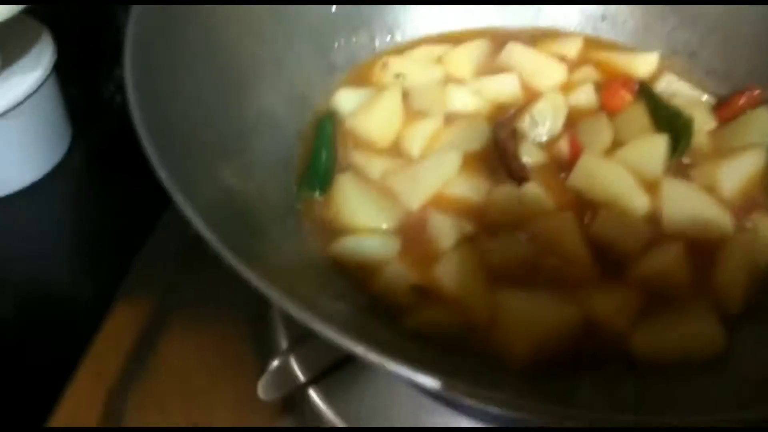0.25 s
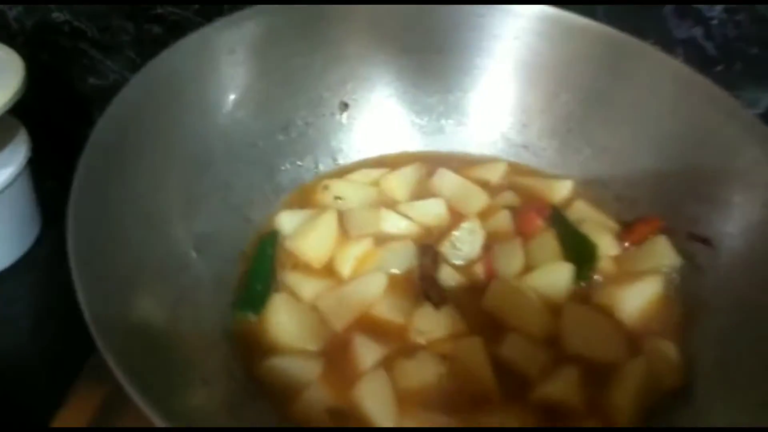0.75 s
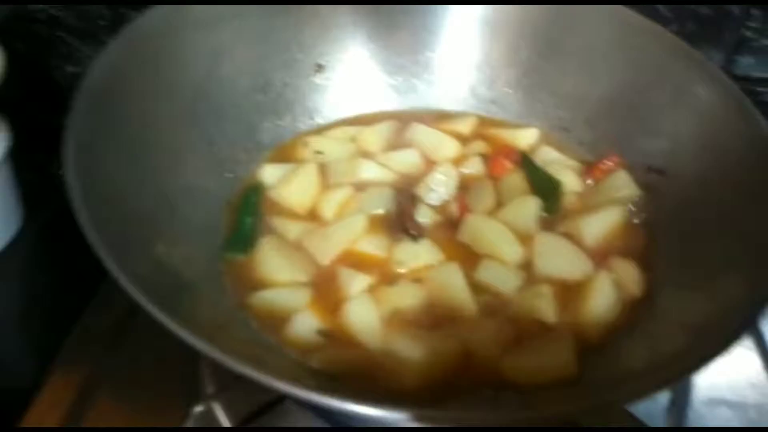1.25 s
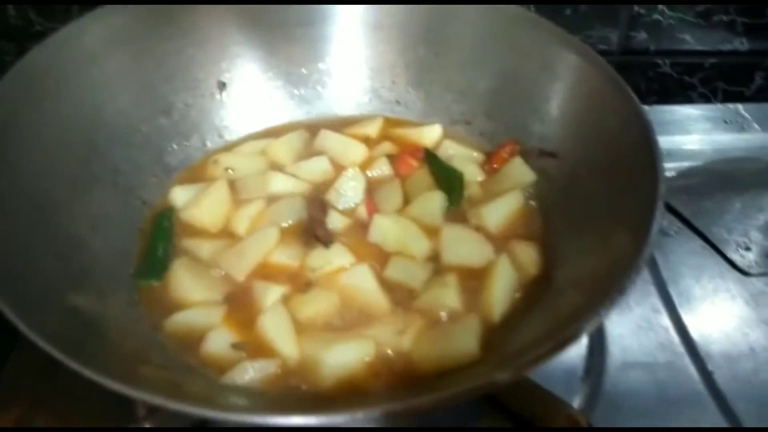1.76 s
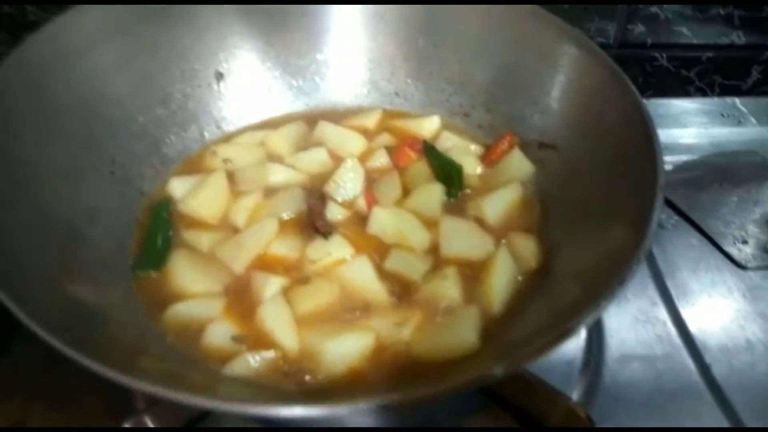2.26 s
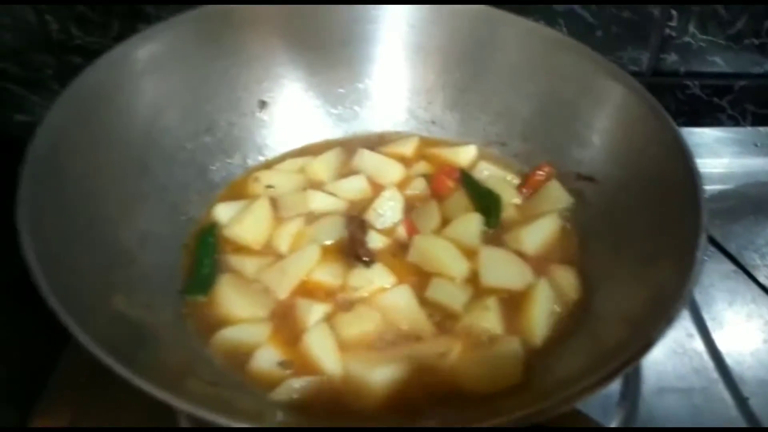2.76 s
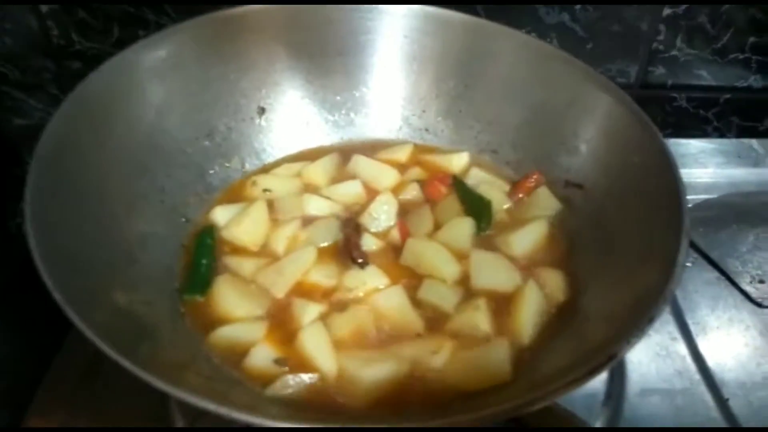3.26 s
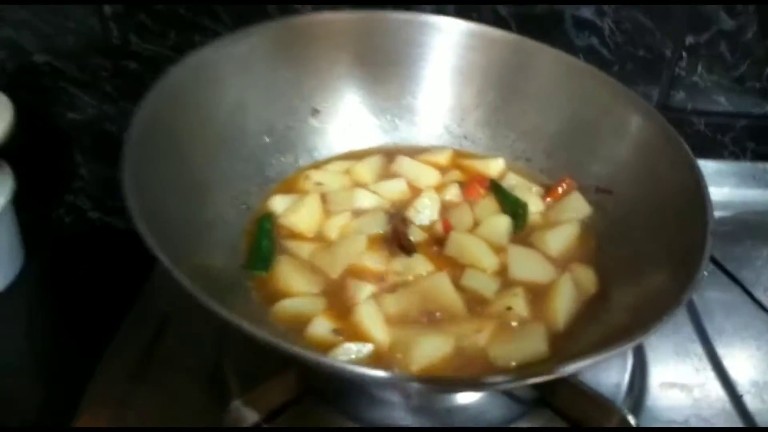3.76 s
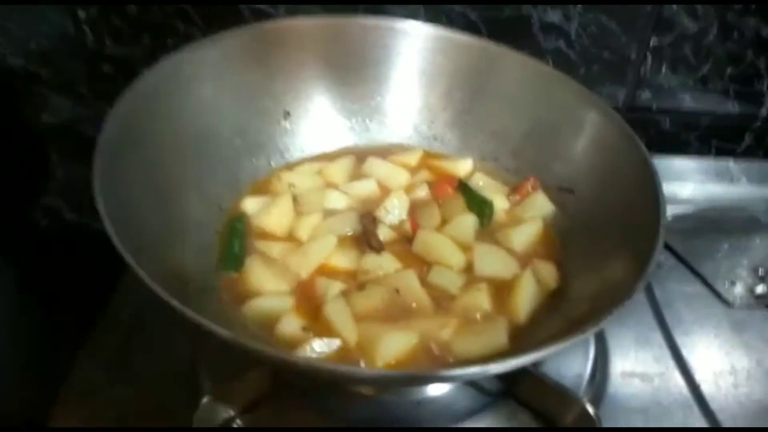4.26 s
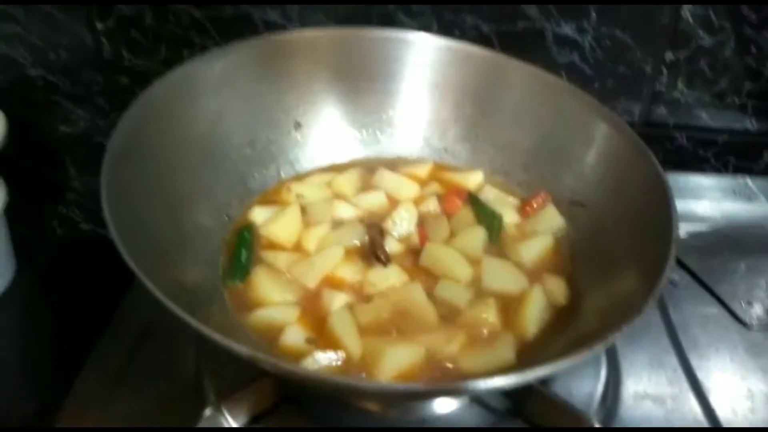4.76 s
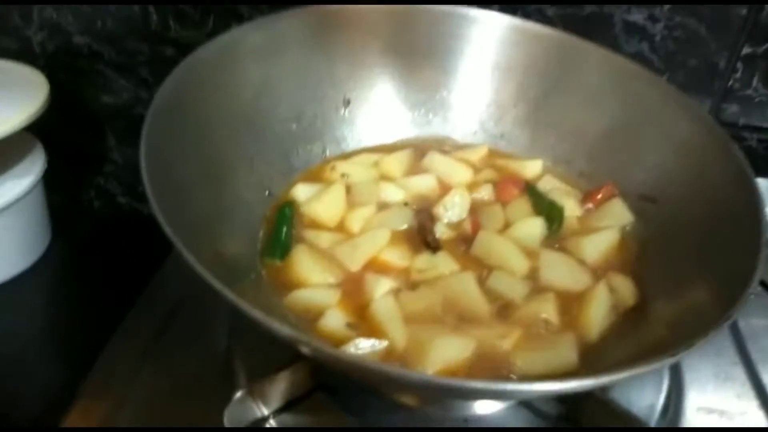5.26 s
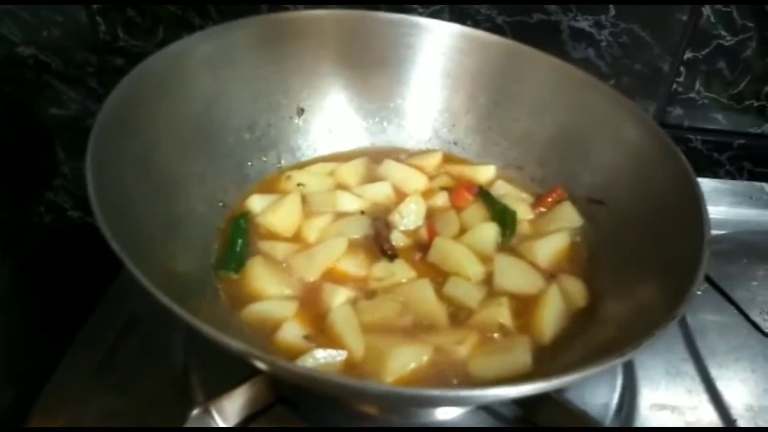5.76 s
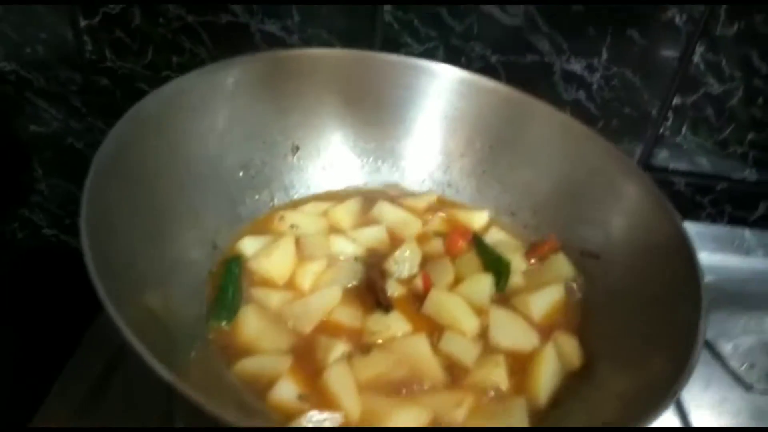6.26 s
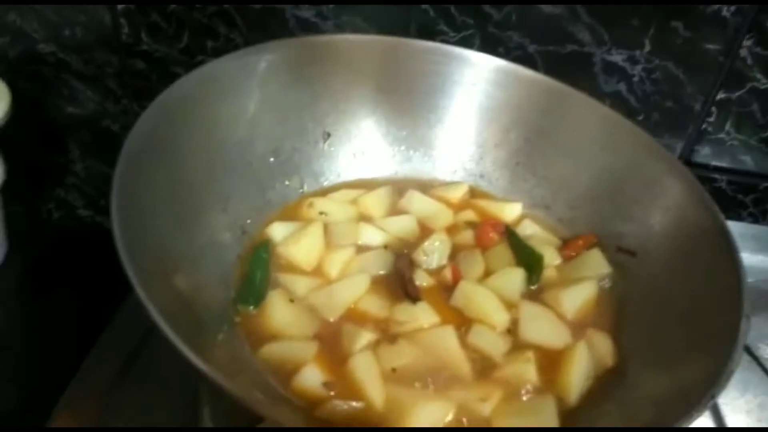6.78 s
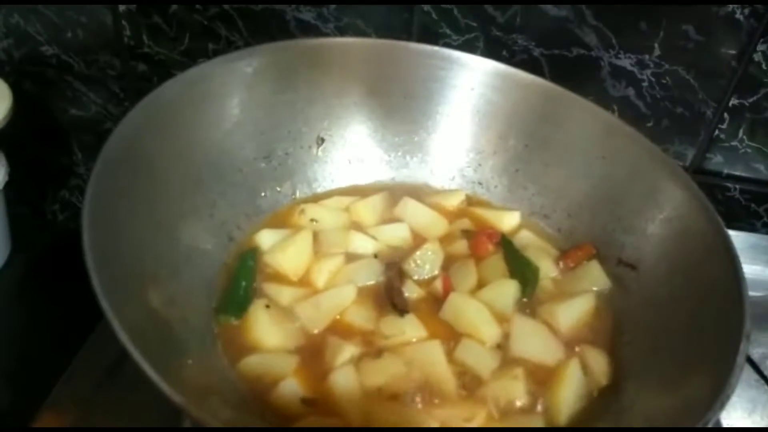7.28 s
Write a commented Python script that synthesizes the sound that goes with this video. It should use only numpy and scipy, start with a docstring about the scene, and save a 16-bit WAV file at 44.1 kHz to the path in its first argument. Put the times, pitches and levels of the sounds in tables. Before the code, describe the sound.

In a small hard-walled kitchen, a low fan hum pulses about nine times a second over a fluttering gas flame. Close by, gravy hisses, bubbles and spits in a steel wok. Utensils clack, loudest around two seconds, then rattle again near six and seven with a spoon and bowl ringing. Stereo handheld microphone; from about four seconds a hand cups the right side, making it hollow.

```python
"""A fan's two close tones throb over a rumbling gas flame while curry gravy hisses and spits in a steel wok.
Steel utensils clatter: noise bursts shaped into dense modes, with cracks, thuds and ringing sines.
Flame, hiss and sizzle are coloured, fluttering noise; bubbles and spits are short sines.
Midway a hand cups the right microphone port, which then sounds hollow: two falling resonances."""
import sys
import numpy as np
from scipy import signal
from scipy.fft import rfft, irfft, next_fast_len
from scipy.io import wavfile
from scipy.ndimage import uniform_filter1d, map_coordinates

SR = 44100
rng = np.random.default_rng(int(sys.argv[2]) if len(sys.argv) > 2 else 0)


def to_wav(s):
    """Save 16-bit WAV."""
    ch = np.atleast_2d(s).T  # columns
    pcm = np.round(np.clip(ch, -1, 1) * 32767)  # PCM
    wavfile.write(sys.argv[1], SR, pcm.astype(np.int16))


N = 331847


def amp(db):
    """Decibels to gain."""
    return 10 ** (np.asarray(db) / 20)


def unit(x):
    """x at rms 1."""
    return x / np.sqrt(np.mean(x ** 2) + 1e-20)


def along(points, hz):
    """(Hz, value) points read on a log axis."""
    f, v = np.transpose(points)
    return np.interp(np.log(hz + 1), np.log(f + 1), v)


def curves(rows):
    """One value per sample for each column after the time."""
    s, *cols = np.transpose(rows)
    return [np.interp(np.arange(N) / SR, s, c) for c in cols]


def wobble(rate_hz, size=N):
    """A smooth random curve, rate_hz knots a second."""
    knots = rng.standard_normal(4096)
    return map_coordinates(knots, [np.arange(size) * rate_hz / SR], mode="wrap")


def filtered(x, response):
    """x times a response of frequency."""
    n = x.shape[-1]
    m = next_fast_len(n + 8192)
    spectrum = rfft(x, m) * response(np.fft.rfftfreq(m, 1 / SR))
    return irfft(spectrum, m)[..., :n]


def colour(points):
    """The response of a (Hz, dB) spectrum."""
    return lambda hz: amp(along(points, hz))


def resonances(modes):
    """The steep-sided response of (centre Hz, width Hz, dB) modes."""
    def response(f):
        return sum(amp(db) * np.abs(f * w / (c * c - f * f + 1j * f * w)) ** 1.46 for c, w, db in modes)
    return response


# left-right correlation of noise: freq_hz, correlation
ALIKE = [(30, 0.99), (90, 0.92), (360, 0.96), (600, 0.49), (1000, 0.6), (2000, 0), (15000, 0.44)]


def rush(response, size=N):
    """Stereo noise of rms 1, most alike in the bass; mid and side powers set the correlation."""
    def mid_side(hz):
        turn = np.arccos(np.clip(along(ALIKE, hz), -1, 1)) / 2
        return response(hz) * np.array([np.cos(turn), np.sin(turn)])
    mid, side = filtered(rng.standard_normal((2, size)), mid_side)
    return unit(np.array([mid + side, mid - side]))


def patches(x, depth_db):
    """Turbulence lifts and sinks small regions of a noise, each some hundred Hz by some 50 ms."""
    z = signal.stft(x, nperseg=1024)[2]
    field = uniform_filter1d(rng.standard_normal(z.shape[1:]), size=3, axis=0)
    field = uniform_filter1d(field, size=5, axis=1)
    return signal.istft(z * amp(depth_db * unit(field)), nperseg=1024)[1][:, :N]


def add(track, s, sound):
    """Mix a sound into the track at time s."""
    part = track[:, max(round(s * SR), 0):][:, :sound.shape[-1]]
    part += sound[..., :part.shape[-1]]


# simmer levels: time_s, steam_db (only its swing about the mean is used), sizzle_db (before SIZZLE_DB)
SIMMER = [(0.0, -54.5, -57), (0.48, -54.5, -58.5), (0.65, -54.5, -57.5), (1.8, -54, -68), (2.24, -56, -69),
          (2.43, -59.5, -70), (2.68, -56.5, -68), (3.01, -55, -61.5), (3.94, -56, -63.5),
          (4.44, -54.5, -61.5), (4.86, -57.5, -66), (5.13, -59.5, -65), (5.61, -65, -77), (5.95, -59, -73),
          (6.47, -63.5, -67), (7.52, -60, -68)]
# steam spectrum: freq_hz, level_db
HISS = [(500, -12), (1300, 0), (2300, 12.5), (3100, -2), (4100, -1), (5000, -16), (7000, -16), (10000, -34),
        (15000, -32)]
# rim sizzle spectrum: freq_hz, level_db
SIZZLE = [(4000, -26), (7000, -11.5), (11000, -18), (13000, -10), (14600, -1), (15400, 4), (16000, -17)]
HISS_DB, HISS_SWING = -51.5, 1.61  # mean level; dB of hiss per dB of steam
BUBBLES_DB, SIZZLE_DB = -5, 0.5  # bubbles against hiss; lift of sizzle_db


def simmer():
    """Steam hisses, louder on the left; bubbles ring; tiny bubbles burst in clumps along the hot rim."""
    steam_db, sizzle_db = curves(SIMMER)
    hiss_db = HISS_DB + HISS_SWING * (steam_db - steam_db.mean())
    steam = patches(rush(colour(HISS)), depth_db=2.3)
    hiss = amp(hiss_db + 0.85 * wobble(40)) * steam * amp([[1], [-1.5]])
    blips = amp(hiss_db + BUBBLES_DB) * bubbles(rate_hz=220, pitch_hz=1756, cycles=13.7)
    clumps = amp(4.0 * wobble(40) + 2.6 * wobble(400))
    sizzle = unit(clumps * patches(rush(colour(SIZZLE)), depth_db=3.5))
    return hiss + blips + amp(sizzle_db + SIZZLE_DB) * sizzle * amp([[1], [-2]])


def bubbles(rate_hz, pitch_hz, cycles):
    """Small bubbles in the gravy ring briefly and rise in pitch as they surface."""
    out, t = np.zeros((2, N)), np.arange(2048) / SR
    draws = rng.random((int(rate_hz * N / SR), 5))
    for when, pitch, size, left, right in draws:
        hz = pitch_hz * 2 ** (2 * (pitch - 0.5))  # an octave either way
        age = hz * t / cycles
        turns = hz * t * (1 + 0.003 * age) + np.array([[left], [right]])
        blip = np.sin(2 * np.pi * turns)
        level = amp(-2.5 * np.log(size + 0.015))
        add(out, when * N / SR, level * age * np.exp(-age) * blip)
    return unit(out)


# gravy spits: start_s, peak_db (before a 0.5 dB lift), pitch_hz
SPITS = [(0.1834, -37, 3730), (0.4444, -40, 3510), (0.5631, -35, 4080), (0.7514, -19.5, 3950),
         (0.797, -36, 3950), (0.8889, -39, 3850), (2.164, -34, 5400), (4.3585, -32.5, 3830),
         (6.1709, -18, 6900), (6.233, -34, 8500)]


def spits():
    """A bursting bubble is a dry snap of sine and noise, 60 dB down in 4.3 ms, with a faint echo."""
    out, t = np.zeros((2, N)), np.arange(2048) / SR
    for start_s, peak_db, pitch_hz in SPITS:
        spray = rush(resonances([(pitch_hz, 0.2 * pitch_hz, 0), (8200, 1500, -4)]), size=len(t))
        snap = amp(-60 * t / 0.0043) * (np.sin(2 * np.pi * pitch_hz * t) + amp(-2) * spray)
        echo = amp(-39 - 60 * t / 0.08) * spray
        onset = 1 - np.exp(-t / 0.00022)
        add(out, start_s, amp(peak_db + 0.5) * onset * (snap + echo))
    return out


# utensil contacts; dB columns are anchors for the crack and the spectrum offsets below:
# contact_s, peak_db, body_db, clack_db, clink_db, shimmer_db, rise_s, t60_s, thud_hz
CLATTER = [(1.453, -20, -56, -48, -51, -46.5, .003, 0.15, 800),
           (1.8, -37, -49, -41, -48, -61, .003, 0.15, 795),
           (2.177, -26, -42, -41, -31.5, -24, .003, 0.27, 780),
           (2.1904, 2.5, -31.5, -35, -29.5, -40, 0.0019, .27, 782),
           (2.365, -22, -34.5, -39.5, -42.5, -43.5, 0.0022, 0.18, 797),
           (2.889, -43, -48, -49, -53, -54, .006, 0.31, 800),
           (5.853, -22, -26, -31.5, -27, -42.5, .009, 0.19, 655),
           (6.018, -30, -38, -39, -30.5, -34, 0.01, .2, 805),
           (6.044, -23, -33, -39.5, -40, -42, 0.0059, 0.19, 655),
           (6.749, -30, -49, -41, -26, -35, 0.014, 0.1, 810),
           (7.140, -15, -25.5, -31, -24, -21.5, 0.0044, 0.19, 840),
           (7.464, -8, -21.5, -18.5, -25, -18.5, 0.0061, 0.18, 916),
           (7.486, -15, -28.5, -60, -22.5, -35, .004, 0.18, 902)]
# hollow knock modes: freq_hz, width_hz, level_db
KNOCK = [(650, 22, -2), (890, 22, 1), (1337, 24, 3), (1840, 39, 3), (2210, 110, -6.5)]
# first crack spectrum: freq_hz, level_db
CRACK = [(30, -12), (150, -2), (700, 7), (2500, -1), (5500, -6), (8500, -19), (15000, -14)]
LEAD_IN_S = 0.012
THUD_T60_S, THUD_RISE_S = 0.16, 0.0064


def clatter():
    """Each contact is a soft lead-in, a crack, a low thud and dense steel modes the tiled room draws out."""
    out, t = np.zeros((2, N)), np.arange(SR // 2) / SR
    for contact_s, peak_db, body, clack, clink, shimmer, rise_s, t60_s, thud_hz in CLATTER:
        tone = [(90, body - 20), (650, body - 3), (1400, body - 3), (2200, clack + 2), (3600, clack - 6),
                (5800, clink - 4), (8300, shimmer - 13), (10500, shimmer - 9), (15000, shimmer - 8)]
        # every contact has its own comb of peaks and notches
        ripple = np.minimum(rng.standard_normal(256), 1.3)
        ripple_hz = np.linspace(0, SR / 2, len(ripple))

        def modes(hz):
            comb_db = 5.8 * np.interp(hz, ripple_hz, ripple)
            return amp(along(tone, hz) + comb_db) * (1 + resonances(KNOCK)(hz))

        level = np.sqrt(np.sum(amp([body, clack, clink, shimmer]) ** 2))
        # a faint noise swells just before each contact
        after = np.maximum(t - LEAD_IN_S, 0)
        swell = 1 - np.exp(-after / rise_s) + amp(-19.5) * np.minimum(t / LEAD_IN_S, 1)
        rattle = unit(amp(2.5 * wobble(264, size=len(t))))
        burst = rattle * swell * amp(-60 * after / t60_s) * rush(modes, size=len(t))
        add(out, contact_s - 0.002 - LEAD_IN_S, level * burst)
        thud = np.sin(2 * np.pi * thud_hz * t) * (1 - np.exp(-t / THUD_RISE_S))
        add(out, contact_s, amp(body - 60 * t / THUD_T60_S) * thud)
        snap = amp(peak_db - 10.5 - 60 * t / 0.011) * (1 - np.exp(-t / 0.00068))
        add(out, contact_s + 0.002, snap * rush(colour(CRACK), size=len(t)))
    return out


def ring(modes, start_s, gain_db, blur, blur_width_hz):
    """Struck steel rings in modes that waver as it moves, each in a decaying blur of reflections."""
    out, t = np.zeros((2, N)), np.arange(SR) / SR
    for hz, level_db, t60_s in modes:
        steady = np.sin(2 * np.pi * (hz * t + rng.random((2, 1))))
        wavering = unit(steady + 0.9 * rush(resonances([(hz, 50, 0)]), size=len(t)))
        reflections = rush(resonances([(hz, blur_width_hz, 0)]), size=len(t))
        echoes = blur * amp(-60 * t / 0.33) * reflections
        envelope = amp(gain_db + level_db - 60 * t / t60_s) * (1 - np.exp(-t / 0.0016))
        add(out, start_s, envelope * (wavering + echoes))
    return out


# spoon modes: freq_hz, relative_db, t60_s
SPOON = [(5080, -13, .12), (5520, -7, .17), (5690, -3, .2), (5760, -7, .17), (8300, -12, .14),
         (10275, -2, .15), (11900, -6, .11), (12200, -6, .11), (14580, -1, .14), (15330, -5, .12)]


def spoon():
    """A spoon rings once in short, high modes."""
    return ring(SPOON, start_s=6.748, gain_db=-29.0, blur=1.5, blur_width_hz=220)


# bowl modes: freq_hz, relative_db, t60_s
BOWL = [(808, -14, .3), (2310, -1, .12), (4334, -24, .17), (4867, -25, .85), (5658, -11, .85),
        (5712, -20, .6), (6245, -1, .24), (6794, -12, .19), (7138, -17, .24), (10440, -12, .15),
        (14740, -16, .19)]


def bowl():
    """A bowl rings once, in modes from low to high."""
    return ring(BOWL, start_s=7.141, gain_db=-21.0, blur=0.97, blur_width_hz=180)


# flame level: time_s, level_db (before RUMBLE_DB or DRONE_DB)
FLAME = [(0.0, -53), (1.44, -52), (2.36, -52.5), (3.16, -55), (3.31, -52), (3.9, -54.5), (5.57, -51),
         (5.82, -54), (7.52, -52)]
# swells of the low drone: centre_s, gain_db
SWELLS = [(1.05, 10), (1.72, 6.5), (2.17, 9), (3.08, 9.5), (4.52, 5.5), (6.32, 10)]
# rumble spectrum: freq_hz, level_db
RUMBLE = [(20, -35), (50, -35), (65, -19), (90, 0.5), (108, -0.5), (120, 5), (130, -4.5), (143, 0.5),
          (162, 4.5), (180, -11.5), (260, -1), (420, -9), (600, -41)]
# burner resonance: freq_hz, width_hz, level_db
BURNER = [(210.3, 16.4, 0)]
# wok resonances: freq_hz, width_hz, level_db
WOK = [(462.5, 27, 0.5), (542.6, 71, -1), (722.3, 11.2, 4.5), (937, 62, 0.5), (1040, 63, -1.5),
       (1085.3, 18.5, 5.5), (1407, 57, -7.5), (1630, 33, -11), (2004, 300, -3), (2253, 148, -3.5)]
# roar spectrum: freq_hz, level_db
ROAR = [(200, -22.5), (430, 5.5), (650, -5), (1000, 2), (1300, -4), (2300, -1.5), (2800, -28), (3600, -14),
        (5000, -15.5), (6500, -21.5), (8500, -19.5), (11000, -29.5), (15500, -33)]
RUMBLE_DB, DRONE_DB = 7.5, 4.5  # over level_db
SWELL_S = 0.065


def flame():
    """The fluttering flame rumbles, drones in the burner and roars under the wok."""
    level_db, = curves(FLAME)
    t = np.arange(N) / SR
    swell_db = sum(db * np.exp(-((t - s) / SWELL_S) ** 2) for s, db in SWELLS)
    flutter = amp(2.2 * wobble(24) + 1.4 * wobble(7))
    rumble = amp(level_db + RUMBLE_DB) * unit(rush(colour(RUMBLE)) * flutter)
    burner = unit(rush(resonances(BURNER)) * amp(1.7 * wobble(20)))
    drone = amp(level_db + DRONE_DB + swell_db) * burner
    wok = amp(-43.5 + 1.73 * wobble(18)) * rush(resonances(WOK))
    roar = amp(-47 + 1.3 * wobble(12)) * rush(colour(ROAR))
    return rumble + drone + patches(wok, depth_db=1.77) + patches(roar, depth_db=1.5)


# first fan tone: time_s, level_db
HUM = [(0, -37.5), (.8, -35), (1.75, -39.5), (2.1, -36.5), (3.2, -39), (3.8, -36.5), (5.5, -38.5), (6, -37),
       (7, -38), (7.5, -35)]
# second tone's distance below the first: time_s, beat_hz
BEAT = [(0, 9.62), (2.4, 9.3), (3.2, 9.15), (5.2, 9.25), (7.5, 9.4)]
# casing resonances: freq_hz, width_hz, level_db
FAN_CASE = [(303.3, 21, -6.5), (340.8, 11.5, -2.5), (359.5, 30, -4), (380.3, 23, -5)]
HUM_HZ, FIRST_THROB_S = 362.4, 0.048
SECOND_TONE_DB, CASING_DB = -3, -1  # against the first tone


def fan():
    """Two close tones beat about nine times a second over the turbulent ring of the casing."""
    t = np.arange(N) / SR - FIRST_THROB_S
    (hum_db,), (beat_hz,) = curves(HUM), curves(BEAT)
    beats = np.cumsum(beat_hz) / SR - beat_hz[0] * FIRST_THROB_S
    first = np.sin(2 * np.pi * HUM_HZ * t)
    second = amp(SECOND_TONE_DB) * np.sin(2 * np.pi * (HUM_HZ * t - beats))
    casing = unit(rush(resonances(FAN_CASE)) * amp(1.63 * wobble(25)))
    return amp(hum_db) * (np.sqrt(2) * (first + second) + amp(CASING_DB) * casing)


# faint narrow bands: middle_s, length_s, freq_hz, width_hz, level_db
FAINT_TONES = [(.5, 1.1, 548, 42, -45.5), (1.466, 0.046, 4250, 150, -45), (1.806, 0.043, 5600, 98, -48),
               (2.93, .16, 13500, 400, -57), (4.86, .4, 460, 4.4, -44.5), (5.448, .45, 4900, 220, -66),
               (6.31, 0.28, 10600, 520, -55.5), (6.32, .16, 11900, 450, -60)]


def faint_tones():
    """Narrow bands of noise swell and fade."""
    out = np.zeros((2, N))
    for middle_s, length_s, hz, width_hz, level_db in FAINT_TONES:
        size = int(length_s * SR)
        tone = rush(resonances([(hz, width_hz, 0)]), size=2 * SR)[:, :size]
        add(out, middle_s - length_s / 2, amp(level_db) * signal.windows.hann(size) * tone)
    return out


DIP_START_S, DIP_DB, DIP_FALL_S, DIP_RECOVER_S = 2.185, -4.5, 0.09, 0.44


def dip():
    """A gain that sinks quickly and comes back slowly."""
    since_s = np.arange(N) / SR - DIP_START_S
    return amp(np.interp(since_s, np.cumsum([0, DIP_FALL_S, DIP_RECOVER_S]), [0, DIP_DB, 0]))


def scene():
    """Simmer, utensils, stove and fan; fan and flame dip briefly near the loudest clack."""
    utensils = (clatter() + spoon() + bowl()) * amp([[1], [-1.5]])
    return simmer() + spits() + utensils + dip() * (flame() + fan()) + faint_tones()


# hand over the right port: time_s, covered_share, hollow_hz
HAND = [(0, 0, 3060), (4.3, 0.12, 3040), (4.44, 0.44, 2720), (4.55, 0.7, 2240), (4.72, 0.5, 2280),
        (4.91, 1, 2170), (5.15, 0.56, 2150), (6.4, 0.59, 2095), (7.52, .72, 2140)]
# colour of the cupped port: freq_hz, level_db
CUPPED = [(300, 0.5), (1200, -0.5), (2600, 3), (3700, -0.5), (5200, -2.5), (7000, 0.5), (9000, -1.5),
          (12800, -2.5), (15000, -3)]


def cupped(right):
    """The hollow of the hand adds two resonances, which sink overall as it closes over the port."""
    hz, t, z = signal.stft(right, SR, nperseg=512)
    time_s, share, pitch_hz = np.transpose(HAND)
    cover = np.interp(t, time_s, share)
    hollow_hz = np.interp(t, time_s, pitch_hz)
    f = hz[:, None]
    hollow = resonances([(hollow_hz, 240, 15.5), (2.35 * hollow_hz, 700, -3)])(f)
    gain = amp(cover * along(CUPPED, f)) + cover * hollow
    return signal.istft(z * gain, SR, nperseg=512)[1][:N]


def suppress(x, depth_db, knee):
    """Noise suppression turns each band down while its power is low against its median; 1 dB makeup."""
    z = signal.stft(x, nperseg=1024)[2]
    # size 2 on axis 1 smooths over neighbouring bands
    power = uniform_filter1d(np.abs(z) ** 2, size=2, axis=1).clip(1e-20)
    usual = np.median(power, axis=2, keepdims=True)
    gain = amp(-depth_db / (1 + (power / (knee * usual)) ** 2))
    return signal.istft(z * gain * amp(1.0), nperseg=1024)[1][:, :N]


# colour of the open left port: freq_hz, level_db
LEFT_PORT = [(100, -1), (300, 1.5), (900, -1), (2000, 0.5), (3200, 5), (5000, 0.5), (9000, 1.5), (14500, 6)]
TOP_HZ = 15650


def record(dry):
    """A bright left port, a hand over the right one, noise suppression and a band limit at TOP_HZ."""
    ports = np.array([filtered(dry[0], colour(LEFT_PORT)), cupped(dry[1])])
    quieted = suppress(ports, depth_db=8.5, knee=1.16)
    return filtered(quieted, lambda hz: np.clip((TOP_HZ - hz) / 200 + 0.5, 0, 1))


dry = scene()
out = record(dry)
to_wav(out)
```